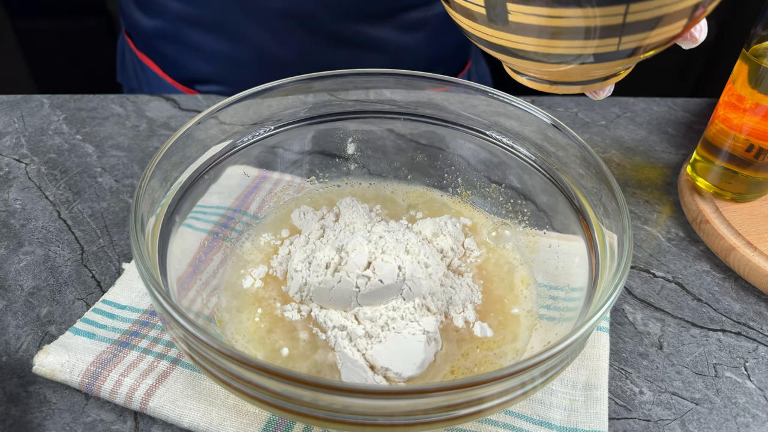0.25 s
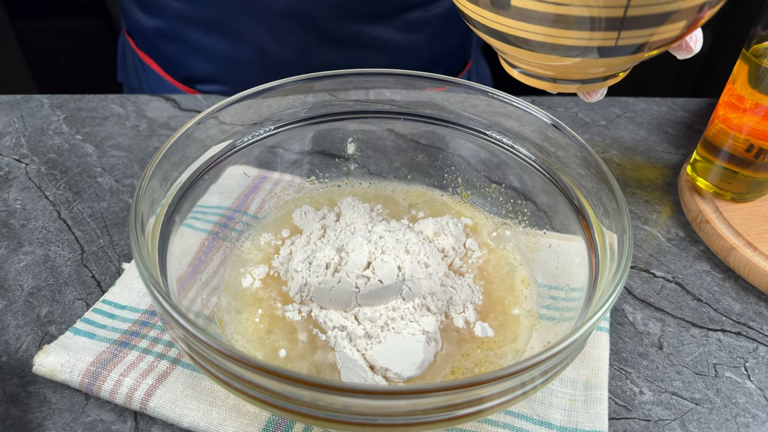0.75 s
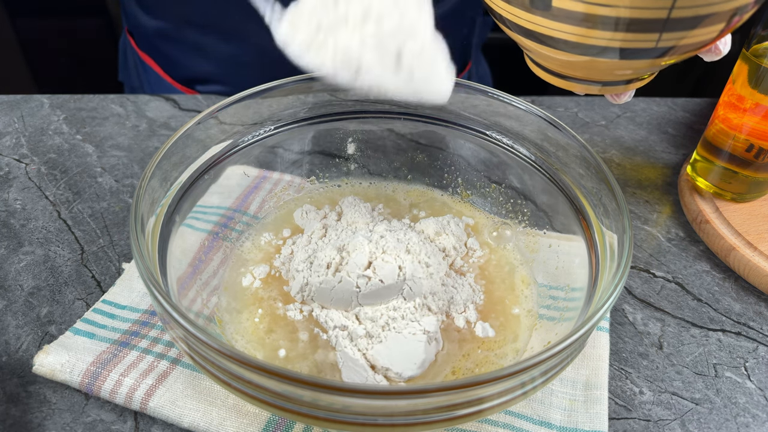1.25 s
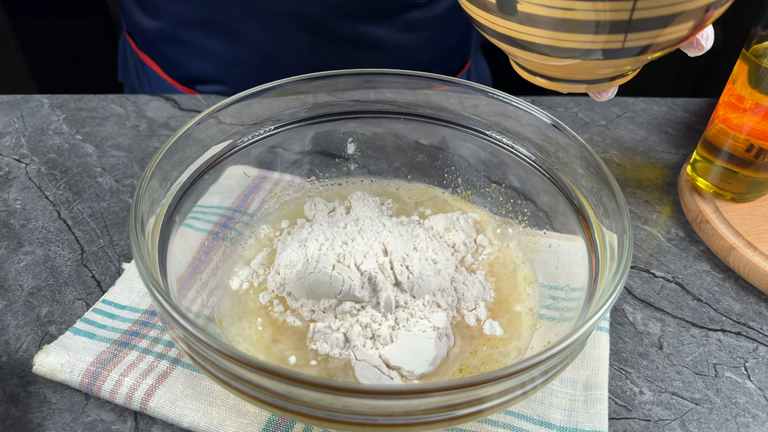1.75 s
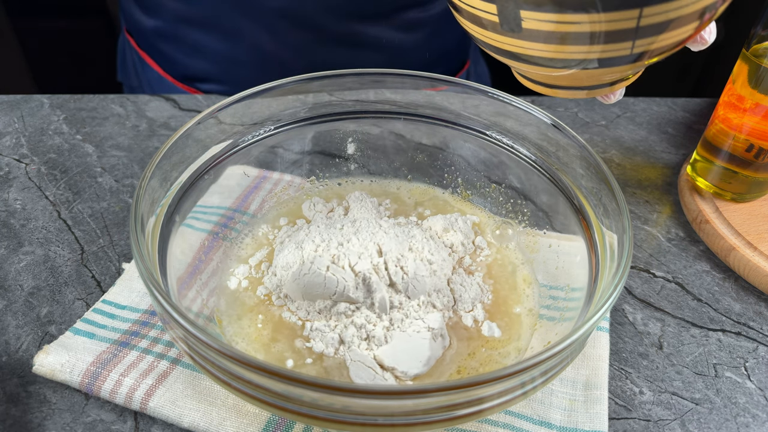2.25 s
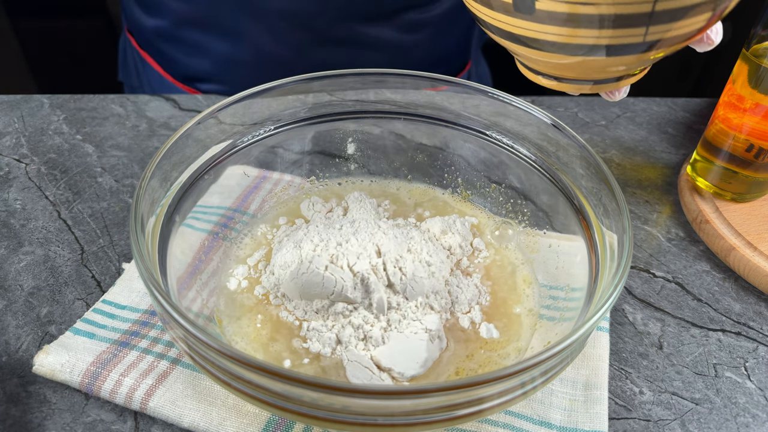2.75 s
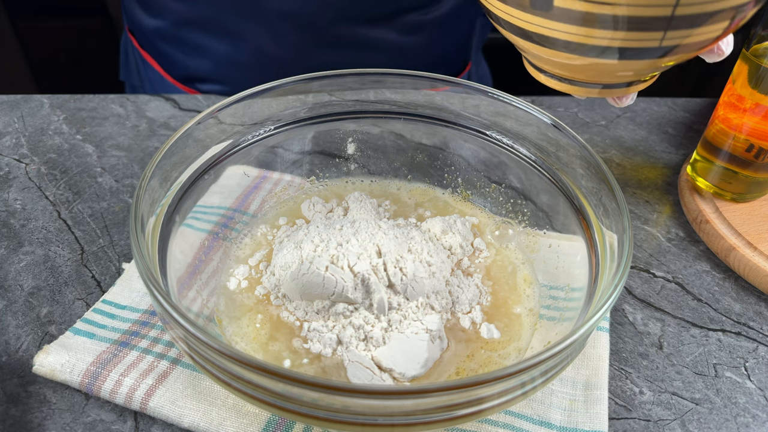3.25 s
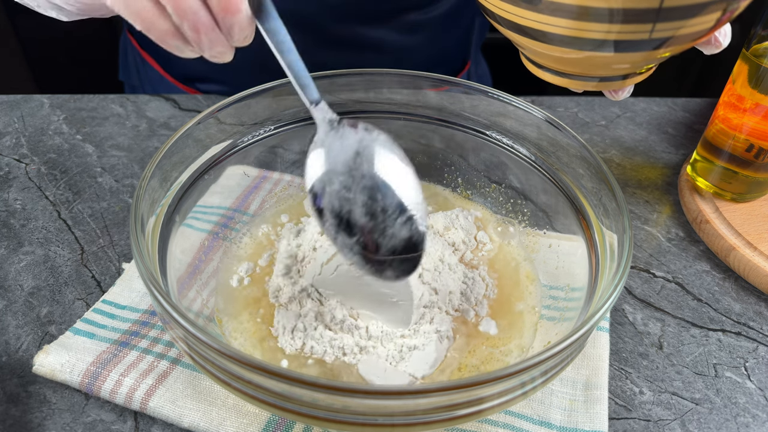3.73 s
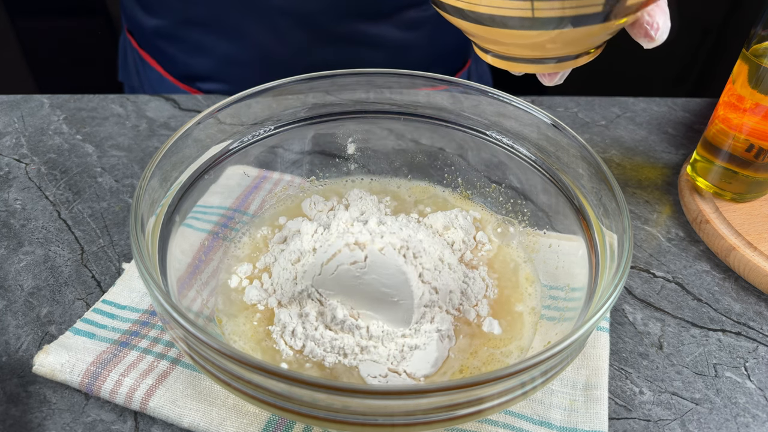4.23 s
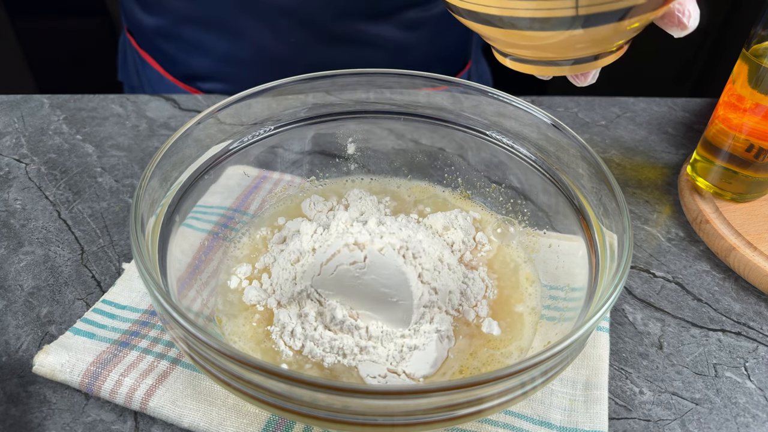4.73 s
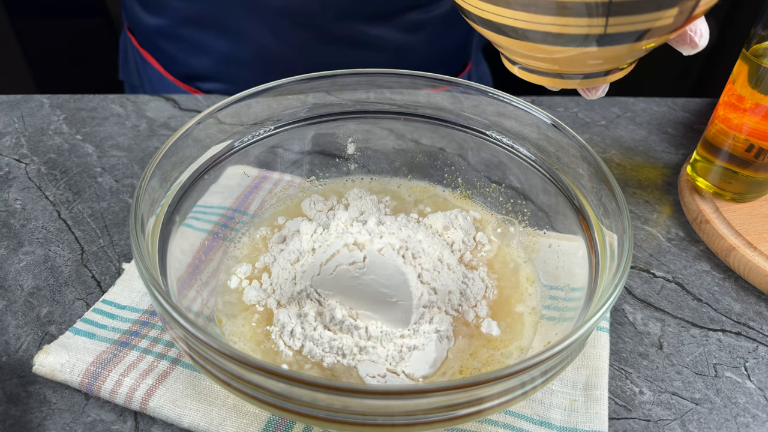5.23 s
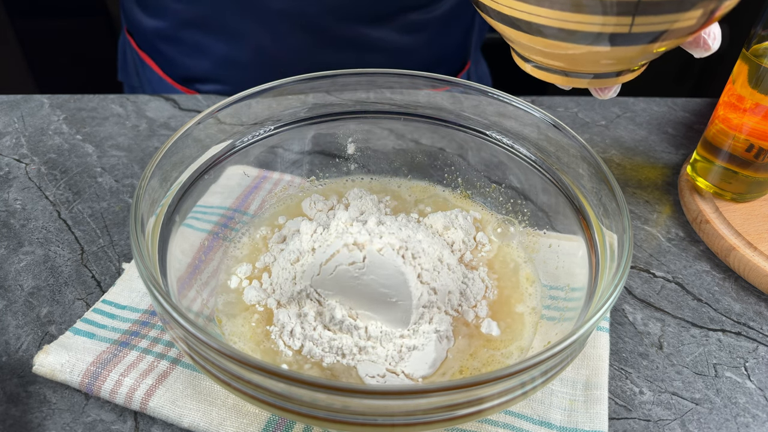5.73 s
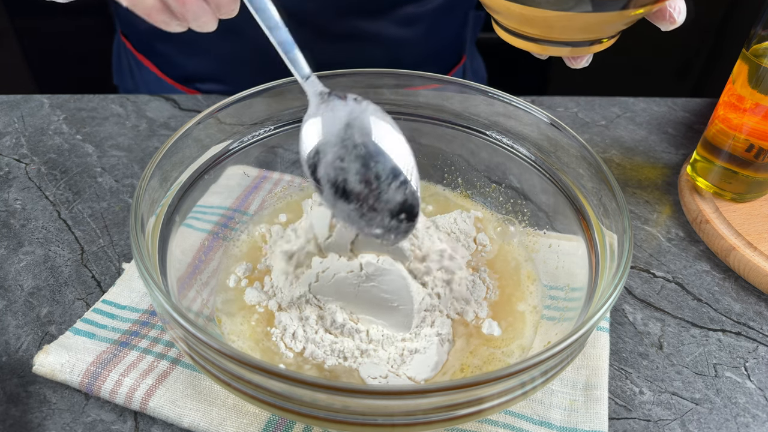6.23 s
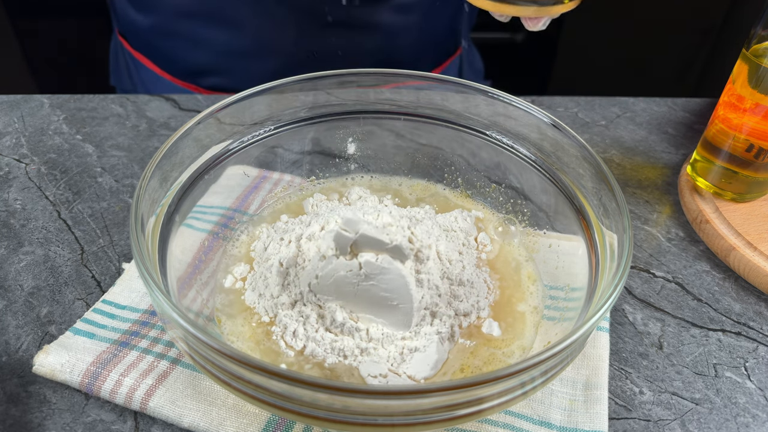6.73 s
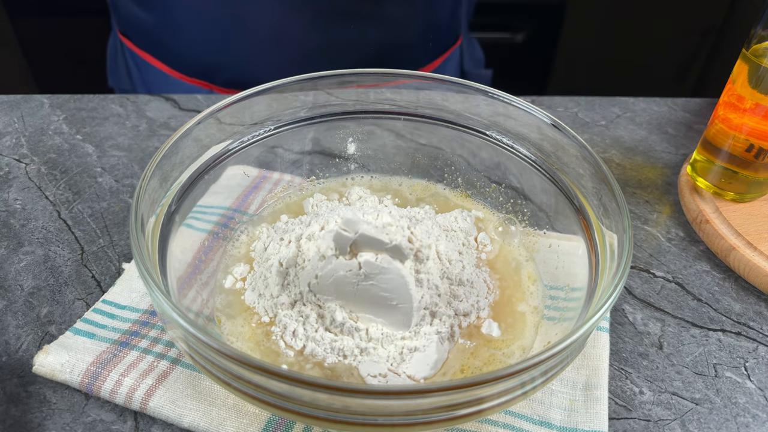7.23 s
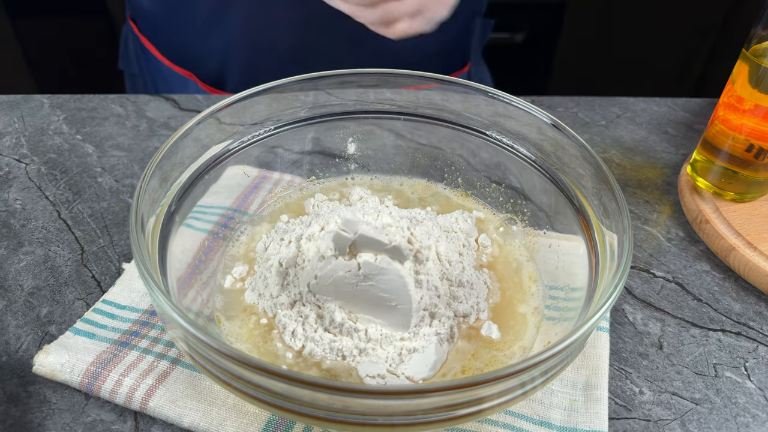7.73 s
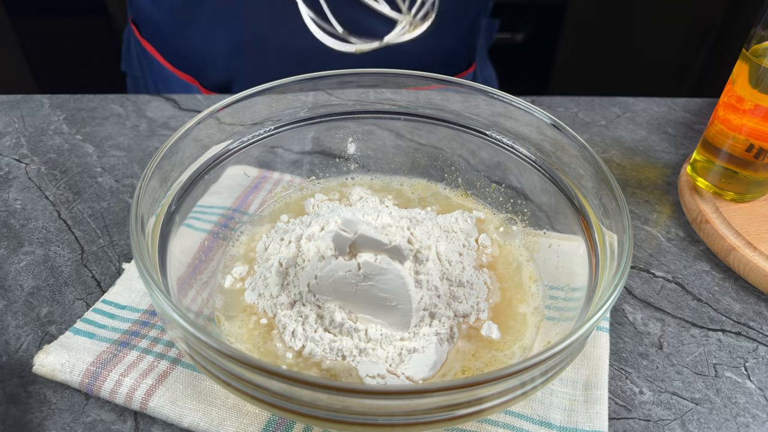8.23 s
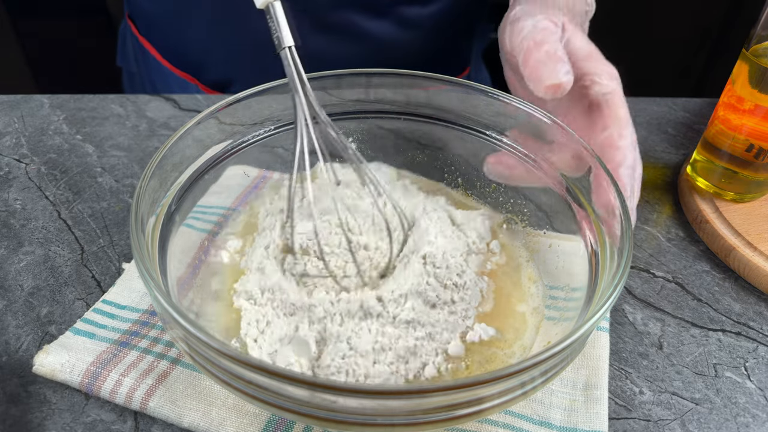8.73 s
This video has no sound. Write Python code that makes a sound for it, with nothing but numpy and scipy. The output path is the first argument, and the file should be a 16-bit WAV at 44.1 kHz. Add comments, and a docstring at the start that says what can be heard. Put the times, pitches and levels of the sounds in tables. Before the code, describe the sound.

In a quiet humming kitchen, a steel spoon knocks and scrapes a ceramic bowl of flour, then bowl and spoon are set down.

```python
"""In a quiet kitchen, a steel spoon digs flour from a hand-held ceramic bowl, knocking and scraping the glaze.
Knocks ring decaying modes of the bowl and spoon; dense slips keep the wall singing while flour crunches.
Bowl and spoon are set down, then gloved hands take up a whisk and push it into the flour: rustle and ticks.
Sleeves and flour rustle as fine noise grains over refrigerator hum (sine tones), whines and room noise.
A stereo recorder listens and widens the image: left and right differ in phase and level by frequency."""
import sys
import numpy as np
from scipy import signal
from scipy.fft import rfft, irfft, next_fast_len
from scipy.io import wavfile

SR = 44100
rng = np.random.default_rng(int(sys.argv[2]) if len(sys.argv) > 2 else 0)


def store_wav(level_fs):
    """Save 16-bit WAV to argv[1]."""
    pcm = np.round(np.clip(np.atleast_2d(level_fs), -1, 1) * 32767)
    wavfile.write(sys.argv[1], SR, pcm.T.astype(np.int16))


N = 396018  # length in samples, about 9 s

# Knocks on the bowl: (time [s], drive level [dB], landing place, weight below 2.8 kHz [dB/octave],
#   brightness above 2.8 kHz [dB/octave], thud of the hand-held body re drive [dB])
KNOCKS = [(0.011, -28.5, "rim", 0, -0.5, -10), (0.0527, -43, "rim", -5.5, 1, -7.5),
          (2.066, -47.5, "flour", -3, 1, 5.5), (2.1564, -55.5, "wall", 10, 0, 12.5),
          (2.166, -38.5, "wall", 9.5, -14, 0), (2.2572, -63, "flour", 6, 1, 6),
          (2.3221, -62, "flour", 9.5, -2.5, 18), (2.3416, -66, "flour", 6, -7, 6),
          (2.5393, -37.5, "wall", 4.5, -2, -7), (4.3301, -65.5, "flour", -0.5, 13, 3),
          (4.5955, -16, "wall", -3.5, 5.5, -14.5), (4.6303, -37, "wall", -5, -1.5, -23),
          (4.6466, -31.5, "wall", -1, -2.5, -7), (4.6536, -40, "wall", -0.5, 2, 3.5),
          (4.6991, -27, "wall", -2, -3, -8), (4.7162, -41, "wall", 3.5, 3, -8.5),
          (4.7279, -44.5, "flour", -6, 1.5, -6), (4.746, -42, "wall", 2.5, 4, -16),
          (5.1011, -55.5, "rim", -11, -14, 2.5), (7.2158, -45, "foot", 1, -8, -5),
          (7.2395, -59, "flour", -2, -3, 13), (7.2887, -21.5, "foot", -1, -1.5, -20.5),
          (7.4016, -36, "foot", 0, 1, -30), (7.668, -62, "foot", -1, -9, 10.5),
          (8.9184, -53.5, "wall", -8, -1, 4)]
# Centres of the tone zones that a landing place colours: [Hz]
KNOCK_ZONES_HZ = [1150, 1950, 2800, 4900, 7500, 12000]
# Colour by landing place: (mode level near each tone zone [dB], level of all modes but the rim's [dB])
LANDINGS = {"rim": ((8, -11.5, 1.5, -9, -20, -5.5), -1.4), "flour": ((5, -4.5, 0, -12.5, -4, -2.5), -5),
            "wall": ((-16.5, -4.5, -1, -9.5, -12.5, -21), 0), "foot": ((-7.5, -3, -0.5, -5, -4, -5.5),
            -2.2)}
# Ringing modes of the ceramic bowl: (frequency [Hz], level [dB], T60 [s])
BOWL_MODES = [(915, -8, 0.015), (1140, 5, 0.021), (1254, 2, 0.021), (1654, -1, 0.018), (2024, 0.5, 0.02),
              (2337, 3.5, 0.011), (2742, 3, 0.021), (3120, 1.5, 0.011), (3550, -15, 0.013),
              (4173, -19.5, 0.023), (4470, 4, 0.0095), (4770, 0, 0.015), (4840, 2, .03), (5200, -4, 0.02),
              (5820, -4, 0.012), (6670, 2, 0.0033), (7265, 5, 0.027), (7630, -2.5, 0.02), (8250, -6, 0.029),
              (10050, -8, .015), (10340, -4, 0.03), (11500, 2, 0.0098), (13155, -0.5, 0.048),
              (14400, -4.5, .015)]
# Bell-like rim modes: row numbers in BOWL_MODES, counted from 0
RIM_MODES = (1, 6, 11)
THUD_HZ, THUD_T60_S = 337, 0.027

# Strokes of steel, or of the bowl's foot, dragged along: (start [s], end [s], contact, wall singing [dB],
#   flour crunch [dB], flour hiss [dB], swell from start to end [dB])
STROKES = [(0.027, 0.022, "free", -46, -75, -68, -21), (0.046, 0.054, "free", -56, -67.5, -52, -2),
           (2.098, 2.261, "free", -85, -58, -66, -1), (2.323, 2.403, "free", -89, -61, -71, -11),
           (4.336, 4.389, "buried", -70.5, -63, -59.5, -14), (4.442, 4.598, "buried", -62.5, -75.5, -70, 7),
           (4.585, 4.7, "free", -52.5, -58, -58, -5), (4.724, 4.807, "free", -48.5, -49, -64, -7),
           (4.941, 5.027, "free", -66, -62, -85, -17), (7.143, 7.26, "foot", -66, -50.5, -52.5, -10),
           (7.294, 7.41, "foot", -52.5, -67, -72, -15), (7.405, 7.455, "foot", -61.5, -52, -78, -8.5)]
# Contacts: spoon on the free wall, spoon buried and loading the wall, foot on stone
CONTACTS = ["free", "buried", "foot"]
STROKE_ATTACK_DB_PER_S, STROKE_RELEASE_DB_PER_S = 901, 900.5
# Modes of the rubbed wall: (frequency [Hz], width [Hz], free [dB], buried [dB], on its foot [dB])
SINGING_MODES = [(1110, 33, -7.5, -20, -15), (2108, 180, -11, -11.5, 2.5), (2650, 64, -26, 1, -21.5),
                 (2730, 26, 0, -10, -20), (3000, 130, -7, -20, -8), (3410, 180, -23, -6.5, -10),
                 (4760, 110, -8.5, -19.5, -11), (4850, 220, -15.5, -5, -10.5), (5280, 90, -14.5, -20, -18),
                 (7060, 52, -14, -18, 4.5), (8390, 60, -14, -18.5, -24.5), (8630, 80, -22.5, -13, -25),
                 (11800, 130, -18, -15, -15), (13150, 60, -15.5, -21.5, -14), (14390, 90, -22, -18, -25)]
# A bowl knocked on rim or wall sings on faintly: level re knock, fall
RING_ON_DB, RING_ON_FALL_DB_PER_S = -30, 119.5
# Spectrum of crunching flour: (frequency [Hz], level per Hz [dB])
CRUNCH_SPECTRUM = [(400, -21), (800, 2), (1100, 3), (1500, -2), (2200, -2), (3200, -9), (4000, -12.5),
                   (5000, -15.5), (6200, -25.5), (8000, -14.5), (14000, -20)]
JOLT_DB = 3  # spread of the crunch's unevenness

# Spoon touching down on the stone top: (time [s], drive level [dB])
SPOON_DROP = [(7.132, -31), (7.136, -33.5), (7.143, -45), (7.151, -38)]
# Ringing modes of the spoon: (frequency [Hz], level [dB], T60 [s])
SPOON_MODES = [(376, -8.5, 0.033), (558.5, -5, 0.0095), (934, -2, 0.011), (1230, -4, 0.029),
               (1970, -1, 0.045), (2090, -20.5, 0.016), (2280, 10.5, 0.011), (2760, -19, 0.023),
               (3420, -3.5, 0.029), (4140, -2, 0.034), (4615, -4, 0.039), (5560, 3, 0.0039),
               (6840, -6.5, 0.029), (8270, 10.5, 0.014), (9800, -10.5, 0.014), (10120, -10.5, 0.024),
               (11060, -1.5, 0.02), (12700, -6, 0.029), (14270, -1.5, .02)]
# Rocking after landing: grain rate, drive level at first, length, level change over that length
ROCKING_PER_S, ROCKING_DB, ROCKING_S, ROCKING_FADE_DB = 300, -81, 0.1, -13

# Dry ticks: (time [s], drive level [dB], duller part at 4-8.5 kHz re drive [dB])
TICKS = [(0.194, -46, -18), (0.305, -45, -1), (0.5178, -43, -20), (1.2712, -44, -20), (1.303, -39, -14),
         (1.335, -47, -15), (1.3688, -40, -25), (1.76, -41, -17), (1.8124, -43, -30), (1.9185, -36.5, -32),
         (2.5027, -47, -21), (2.809, -45, -24), (2.8401, -44.5, -22.5), (2.9695, -44.5, -19.5),
         (3.1069, -43.5, -25), (4.1353, -50, 12), (5.5163, -37.5, -32.5), (5.5600, -46, -24.5),
         (6.129, -42.5, -23.5), (6.5456, -36, -15), (6.6952, -41.5, -21), (6.967, -61, -2.5),
         (8.6456, -47.5, -13.5), (8.6634, -44, -11), (8.737, -44, -14), (8.7573, -40, -24.5),
         (8.7943, -28, -7.5), (8.8116, -40, -11), (8.8206, -27.5, -21), (8.859, -39, -13),
         (8.9116, -39, -10)]
# Further ticks at random: average rate, drive level, duller part re drive
FAINT_TICKS_PER_S, FAINT_TICK_DB, FAINT_DULL_DB = 2, -54.5, -15

# Sleeves moving and flour sliding off the spoon: (peak time [s], level [dB], rise [dB/s], fall [dB/s],
#   duller body re top [dB])
RUSTLES = [(0.303, -77.5, 32, 68, -11), (.666, -83, 140.5, 78, -9), (1.404, -73, 67, 36.5, -18.5),
           (1.783, -77, 149, 60, -23), (2.028, -77.5, 29.5, 40.5, -3.5), (2.572, -84, 30, 111, -9),
           (2.826, -85.5, 22, 61, -8.5), (3.14, -86, 50, 50, -10), (3.554, -74.5, 51.5, 26, -14),
           (3.924, -79.5, 73, 16, -3.5), (5.53, -82, 70, 119, -9.5), (6.203, -72, 40.5, 52, -11),
           (6.622, -75, 99.5, 36, -19), (6.982, -69.5, 120, 23.5, -6.5), (8.583, -73, 89.5, 199, -6.5),
           (8.658, -68, 302, 108.5, -6), (8.798, -72.5, 41, 107, 0), (8.918, -68, 399, 114, 0)]
# Gloved hands taking up the whisk: (time [s], rustle level [dB], duller body re top [dB])
HANDLING = [(7.35, -74, -18), (7.71, -76.5, -5), (7.785, -66.5, -7.5), (7.815, -52, -14),
            (7.89, -46.5, -14), (7.959, -62.5, -2.5), (8.2, -62.5, -6), (8.344, -51, -8.5),
            (8.39, -44, -17), (8.4, -62.5, -5), (8.46, -65.5, -6.5), (8.515, -79, -5)]
# Spectra of the rustle's top and of its duller body: (frequency [Hz], level per Hz [dB])
RUSTLE_TOP = [(3000, -15), (5000, -9.5), (6500, 0), (8300, 3.5), (9500, -1.5), (11000, 8), (13000, 3),
              (15500, -1.5)]
RUSTLE_BODY = [(700, -13.5), (1500, -2.5), (2500, 1.5), (4000, -1), (6000, 1.5), (8000, -14.5)]
# Cloth at rest; body re top, for resting cloth and for the hiss of strokes
STILL_DB, FLOUR_BODY_DB = -89.5, -9

# Motor hum: (frequency [Hz], rms level [dB], spread of the level's waver [dB])
HUM_TONES = [(49.0, -72.5, .3), (58.4, -66, .3), (87.8, -71, 3.0), (98.1, -64, .8), (100.0, -64, .8),
             (103.3, -73, 3.0), (116.8, -63, 1.5)]
# The hum grows unsteady: (time [s], pitch wander [fraction of pitch], change of the two lowest tones [dB])
UNREST = [(7.4, 0.00077, 0.5), (7.6, 0.044, -6), (8.0, 0.032, -3), (8.3, 0.037, -18.5), (8.5, 0.036, 1)]
# Faint motor whines: (frequency [Hz], rms level [dB], width [Hz])
WHINES = [(1870, -82.5, 140), (2460, -86, 79), (8130, -94.5, 140)]

# Spectrum of the room tone: (frequency [Hz], level per Hz [dB])
ROOM_TONE_SPECTRUM = [(20, -26.5), (35, -20), (45, -11.5), (70, -2.5), (120, 1), (250, 4.5), (400, -3.5),
                      (700, -12.5), (1100, -14.5), (1450, -26.5), (2500, -33), (3200, -32), (3800, -41),
                      (7500, -48.5), (11000, -44), (15500, -42.5)]
ROOM_TONE_DB = -58
# Left-right likeness of the room tone: (frequency [Hz], correlation [-1 to 1])
LIKENESS = [(30, 0.68), (200, .85), (600, .45), (1000, 0.082), (1400, 0.3), (1900, 0.49), (2400, 1),
            (16000, 1)]
# Reverberation: decay time of the duller part, its low-pass corner, level
KITCHEN_T60_S, WALL_CUT_HZ, KITCHEN_DB = .35, 6000, -14.5

# Phase between left and right: (frequency [Hz], lead of the right [rad])
STEREO_PHASE = [(0, 0), (350, -.25), (800, .3), (1200, .3), (1900, .45), (2250, 0), (3200, -.62),
                (4300, -.5), (5400, -.05), (6200, 0), (7250, .6), (8000, 0), (8500, .45), (9420, 3.14),
                (15700, 15.7), (22050, 28.4)]
# Level between left and right: (frequency [Hz], left minus right [dB])
STEREO_BALANCE = [(30, -4), (250, 0.8), (600, -0.1), (1150, -0.5), (1450, 5), (2000, 0.15), (3000, 0),
                  (16000, 0)]
CUTOFF_HZ = 16400  # steep upper limit


def bowl():
    """Every knock rings the same wall modes; where it lands sets their balance, and the held body thuds."""
    s, drive_db, places, depth_db, tilt_db, thud_db = (np.array(column) for column in zip(*KNOCKS))
    wall_db = np.array([LANDINGS[place][1] for place in places])
    # the thud follows each knock by 1.7 ms
    thud = ring(clicks(s + 0.0017, from_db(drive_db + thud_db)), THUD_HZ, THUD_T60_S)
    uneven_db = 1.5 * rng.standard_normal((len(s), len(BOWL_MODES)))
    modes = np.zeros(N)
    for k, (hz, level_db, t60) in enumerate(BOWL_MODES):
        zone_db = [np.interp(np.log(hz), np.log(KNOCK_ZONES_HZ), LANDINGS[place][0]) for place in places]
        octaves = np.log2(hz / KNOCK_ZONES_HZ[2])
        slope_db = (tilt_db if octaves > 0 else -depth_db) * octaves
        landing_db = wall_db * (k not in RIM_MODES)
        train = clicks(s, from_db(drive_db + zone_db + slope_db + uneven_db[:, k] + landing_db))
        # a clean blow, its sign alternating from mode to mode, plus chatter of the contact
        blows = (-1) ** k * train + .5 * contact(train, 0.0086)
        modes += from_db(level_db) * ring(blows, hz, t60)
    return filtered(modes, "high", 3, 780) + filtered(thud, "band", 2, [180, 750])


def scraping():
    """Dense slips keep the wall singing, each mode fluttering; flour crunches in lumps under the steel."""
    slips = grains(5500, spread_db=4.5)
    singing_power = np.zeros((len(CONTACTS), N))
    crunch_power = np.zeros(N)
    for start, end, kind, sing_db, crunch_db, _, swell_db in STROKES:
        shape = stroke_shape(start, end, swell_db)
        singing_power[CONTACTS.index(kind)] += from_db(2 * sing_db) * shape
        crunch_power += from_db(2 * crunch_db) * shape
    for s, drive_db, place, *_ in KNOCKS:
        if place in ("rim", "wall"):
            singing_power[0] += ramp(s, s, drive_db + RING_ON_DB, 0, 5000, RING_ON_FALL_DB_PER_S)
    jolts = from_db(JOLT_DB * drift(45))
    out = np.sqrt(crunch_power) * jolts * crunch()
    for hz, width_hz, *levels_db in SINGING_MODES:
        mode = rms_one(ring(slips, hz, width_to_t60(width_hz)))
        level = np.sqrt(from_db(2 * np.array(levels_db)) @ singing_power)
        flutter = from_db(2.7 * drift(16))
        out += level * flutter * mode
    return out


def crunch():
    """Lumps of flour break at unrelated moments in each of four bands; rms 1."""
    edges_hz = [300, 1400, 3000, 6200, 15000]
    lumps = np.zeros(N)
    for low, high in zip(edges_hz, edges_hz[1:]):
        band = filtered(grains(1500, spread_db=3.0), "band", 2, [low, high])
        lumps += band * from_db(3.5 * drift(40))
    return coloured(lumps, CRUNCH_SPECTRUM)


def spoon():
    """The spoon lands, bounces and rocks on the stone; chattering touches ring its short steel modes."""
    s, drive_db = np.transpose(SPOON_DROP)
    rocking_power = ramp(s[0], s[0] + ROCKING_S, ROCKING_DB, ROCKING_FADE_DB, 5000, 1000)
    rocking = np.sqrt(rocking_power) * grains(ROCKING_PER_S, spread_db=2.5)
    rings = np.zeros(N)
    for hz, level_db, t60 in SPOON_MODES:
        touches = contact(clicks(s, from_db(drive_db)), 0.0013)  # fresh chatter for each mode
        rings += from_db(level_db) * ring(touches + rocking, hz, t60)
    return filtered(rings, "high", 2, 250)


def ticks():
    """Millisecond snaps: clicks with short chatter, in a bright part and a duller part."""
    s, drive_db, dull_db = np.transpose(TICKS)
    chance = rng.random(N) < FAINT_TICKS_PER_S / SR
    faint = chance * from_db(FAINT_TICK_DB + 3.0 * rng.standard_normal(N))
    bright = clicks(s, from_db(drive_db)) + faint
    dull = clicks(s, from_db(drive_db + dull_db)) + from_db(FAINT_DULL_DB) * faint
    bright_snaps = bright + 0.7 * contact(bright, .001)
    dull_snaps = dull + 1.06 * contact(dull, 0.00056)
    return filtered(bright_snaps, "high", 2, 8500) + filtered(dull_snaps, "band", 2, [4000, 8500])


def rustle():
    """Cloth and flour rub as dense fine grains, with a duller noise body whose share varies by movement."""
    hands_db, hands_body_db = in_time(HANDLING, outside=-200)  # silent outside the handling
    # each part: power of the top, level of the body re top in dB
    parts = [(from_db(2 * STILL_DB), FLOUR_BODY_DB), (from_db(2 * hands_db), hands_body_db)]
    for s, level_db, rise, fall, body_db in RUSTLES:
        parts.append((ramp(s, s, level_db, 0, rise, fall), body_db))
    for start, end, _, _, _, hiss_db, swell_db in STROKES:
        parts.append((from_db(2 * hiss_db) * stroke_shape(start, end, swell_db), FLOUR_BODY_DB))
    top = coloured(grains(8000, spread_db=3.5), RUSTLE_TOP) * from_db(1.5 * drift(12))
    body = coloured(rng.standard_normal(N), RUSTLE_BODY)
    top_gain = np.sqrt(sum(power for power, _ in parts))
    body_gain = np.sqrt(sum(power * from_db(2 * body_db) for power, body_db in parts))
    return from_db(2.1 * drift(30)) * (top_gain * top + body_gain * body)


def hum():
    """Shaft and mains tones of the motors: sines of wavering level, steady in pitch until they wander."""
    wander, low_db = in_time(UNREST)
    out = np.zeros(N)
    for hz, rms_db, waver_db in HUM_TONES:
        turns = np.cumsum(hz * (1 + wander * drift(2.16))) / SR + rng.random()
        level_db = rms_db + waver_db * drift(0.66) + low_db * (hz < 70)
        out += np.sqrt(2) * from_db(level_db) * np.sin(2 * np.pi * turns)
    return out


def whines():
    """Motor whines: noise through narrow resonances."""
    out = np.zeros(N)
    for hz, level_db, width_hz in WHINES:
        whine = ring(rng.standard_normal(N), hz, width_to_t60(width_hz))
        out += from_db(level_db) * rms_one(whine)
    return out


def room_tone():
    """Steady stereo noise, a shared mid and an opposed side mixed to be least alike around 1 kHz."""
    size = next_fast_len(N)
    hz = np.fft.rfftfreq(size, 1 / SR)
    mid, side = rfft(rng.standard_normal((2, size)))
    alike = np.clip(at_hz(LIKENESS, hz), -1, 1)
    pair = np.sqrt(1 + alike) * mid + np.sqrt(1 - alike) * side * [[1], [-1]]
    noise = irfft(pair * from_db(at_hz(ROOM_TONE_SPECTRUM, hz)), size)[:, :N]
    return from_db(ROOM_TONE_DB) * rms_one(noise)


def kitchen(x):
    """Reverberation: dying noise, its full-band part a little longer; the sides differ only in the lows."""
    t = np.arange(round(.5 * SR)) / SR
    white = rng.standard_normal((3, len(t))) * np.clip(t / .006, 0, 1)  # builds up over 6 ms
    lows = filtered(white[1], "low", 2, 1500)
    dull = filtered(white[0], "low", 1, WALL_CUT_HZ)
    tail = (dull + 1.8 * lows * [[1], [-1]]) * from_db(-60 * t / KITCHEN_T60_S)
    tail = tail + white[2] * from_db(-60 * t / 0.39)
    return signal.fftconvolve(x[None], tail / np.sqrt(np.sum(tail[0] ** 2)), axes=1)[:, :N]


def from_db(db):
    """dB to gain; twice the dB gives power."""
    return 10 ** (np.asarray(db) / 20)


def rms_one(x):
    """Scale to unit rms."""
    return x / np.sqrt(np.mean(x ** 2) + 1e-20)


def filtered(x, kind, order, hz):
    """Butterworth filter."""
    return signal.sosfilt(signal.butter(order, hz, kind, fs=SR, output="sos"), x)


def in_time(rows, outside=None):
    """Columns of a time curve, one value a sample."""
    s, *columns = np.transpose(rows)
    return [np.interp(np.arange(N) / SR, s, column, outside, outside) for column in columns]


def at_hz(points, hz):
    """Read a spectrum on a log-frequency axis."""
    point_hz, values = np.transpose(points)
    return np.interp(np.log(np.maximum(hz, 1)), np.log(point_hz), values)


def drift(rate_hz):
    """Slow random curve of spread 1: low-passed noise made at every 40th sample."""
    r = np.exp(-80 * np.pi * rate_hz / SR)
    noise = rng.standard_normal(N // 40 + 2002)
    slow = signal.lfilter([1], [1, -2 * r, r * r], noise)[2000:]  # drop the filter's run-in
    return np.interp(np.arange(N) / 40, np.arange(len(slow)), rms_one(slow))


def coloured(x, spectrum):
    """Shape a noise by a spectrum; rms 1."""
    size = next_fast_len(N)
    gain = from_db(at_hz(spectrum, np.fft.rfftfreq(size, 1 / SR)))
    return rms_one(irfft(rfft(x, size) * gain, size)[..., :N])


def ring(x, hz, t60):
    """Two-pole resonator: a unit click sets a decaying sine of height 1 ringing."""
    r = from_db(-60 / (max(t60, .003) * SR))
    w = 2 * np.pi * hz / SR
    return signal.lfilter([0, np.sin(w)], [1, -2 * r * np.cos(w), r * r], x + 1e-18)


def width_to_t60(width_hz):
    """Decay time of a resonance from its bandwidth."""
    return np.log(1000) / (np.pi * width_hz)


def clicks(times, gains):
    """Single-sample clicks at the given times."""
    out = np.zeros(N)
    np.add.at(out, np.round(np.asarray(times) * SR).astype(int), gains)
    return out


def contact(train, length_s):
    """A real contact chatters for a moment: each click becomes a short dying noise burst."""
    t = np.arange(round(.012 * SR)) / SR
    envelope = signal.fftconvolve(train, np.exp(-t / length_s))[:N]
    return envelope * rng.standard_normal(N) / np.sqrt(length_s * SR / 2)


def grains(per_s, spread_db):
    """Random clicks of uneven size and sign; rms 1."""
    sizes = from_db(spread_db * np.minimum(rng.exponential(1, N), 5)) * rng.choice([-1, 1], N)
    return rms_one(sizes * (rng.random(N) < per_s / SR))


def ramp(start, end, level_db, swell_db, rise_db_per_s, fall_db_per_s):
    """Power envelope in 16-sample steps: rises to the start, swells to the end, falls away."""
    t = np.arange(0, N, 16) / SR
    held_db = level_db + swell_db * np.clip((t - start) / max(end - start, 1e-3), 0, 1)
    before_db = abs(rise_db_per_s) * np.maximum(start - t, 0)
    after_db = abs(fall_db_per_s) * np.maximum(t - end, 0)
    return np.repeat(from_db(2 * (held_db - before_db - after_db)), 16)[:N]


def stroke_shape(start, end, swell_db):
    """Power envelope of one stroke."""
    return ramp(start, end, 0, swell_db, STROKE_ATTACK_DB_PER_S, STROKE_RELEASE_DB_PER_S)


def scene():
    """Hard contacts with their reverberation, over rustle, motors and room tone."""
    near = bowl() + scraping() + spoon() + ticks()
    background = hum() + whines() + room_tone()
    return near + from_db(KITCHEN_DB) * kitchen(near) + rustle() + background


def record(dry):
    """The recorder widens the stereo: left and right differ in phase and level by frequency; the top is cut."""
    size = next_fast_len(N + 4096)
    hz = np.fft.rfftfreq(size, 1 / SR)
    # half of each difference goes to either side
    half_turn = np.interp(hz, *np.transpose(STEREO_PHASE)) / 2
    right = np.exp(1j * half_turn) / from_db(at_hz(STEREO_BALANCE, hz) / 2)
    pair = irfft(rfft(dry, size) * np.stack([1 / right, right]), size)[:, :N]
    pair = filtered(pair, "low", 6, 15800)
    return signal.sosfilt(signal.cheby2(12, 70, CUTOFF_HZ, fs=SR, output="sos"), pair)


dry = scene()
out = record(dry)
store_wav(out)
```